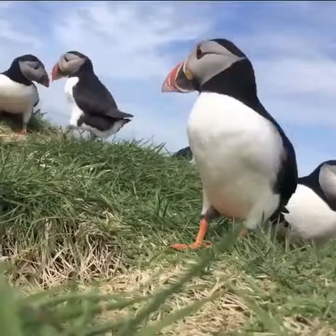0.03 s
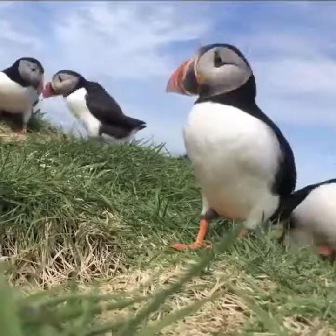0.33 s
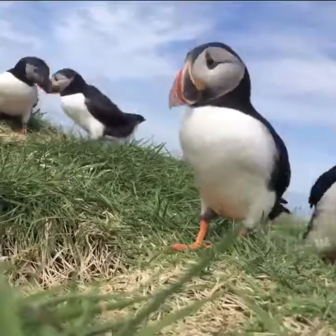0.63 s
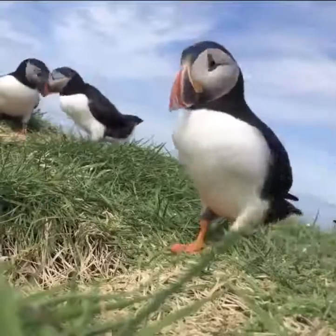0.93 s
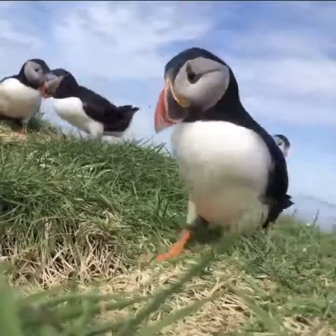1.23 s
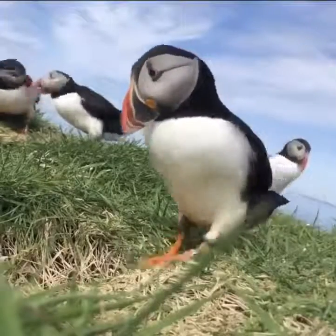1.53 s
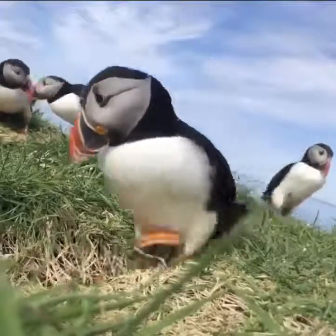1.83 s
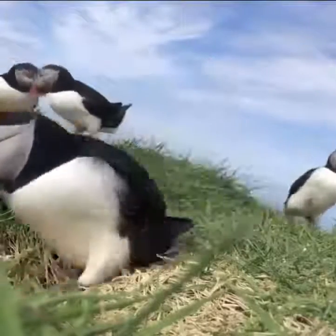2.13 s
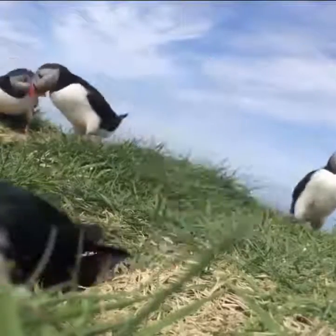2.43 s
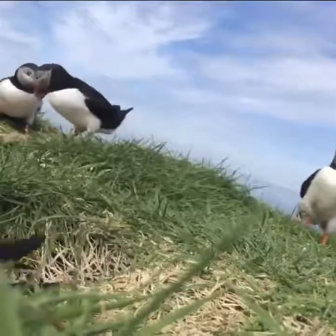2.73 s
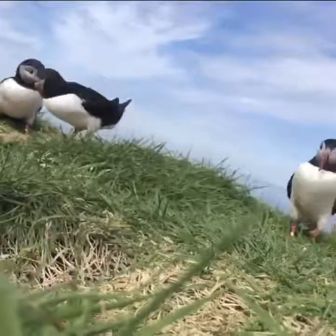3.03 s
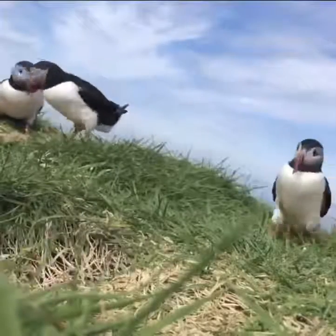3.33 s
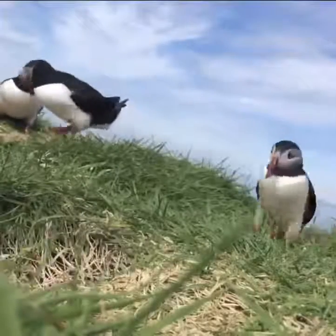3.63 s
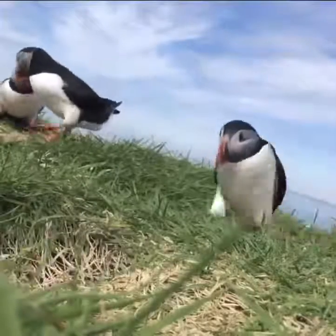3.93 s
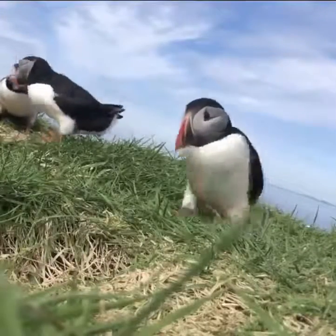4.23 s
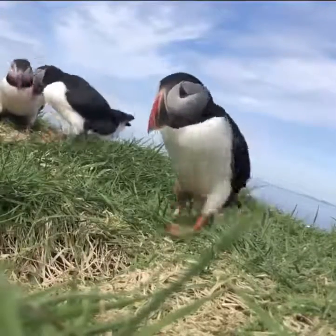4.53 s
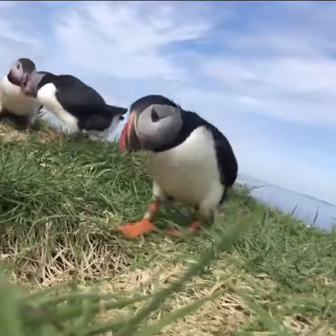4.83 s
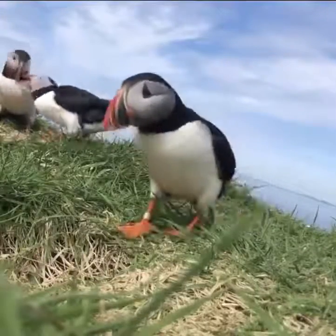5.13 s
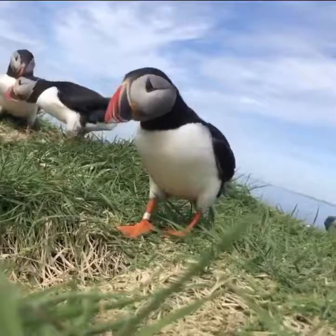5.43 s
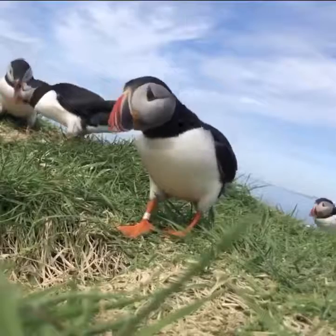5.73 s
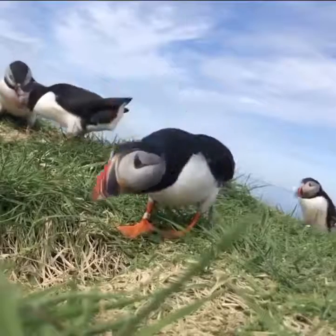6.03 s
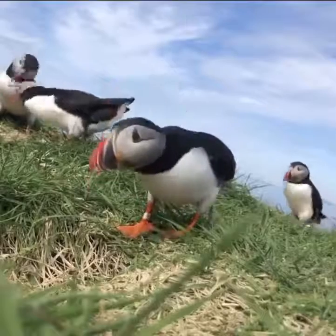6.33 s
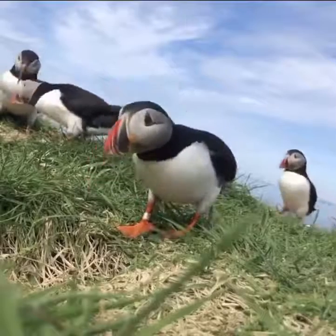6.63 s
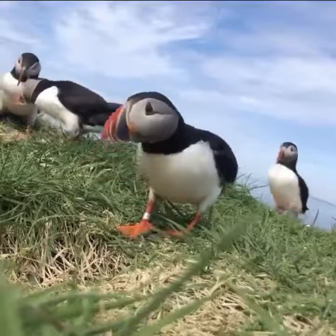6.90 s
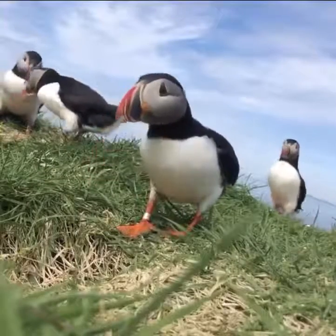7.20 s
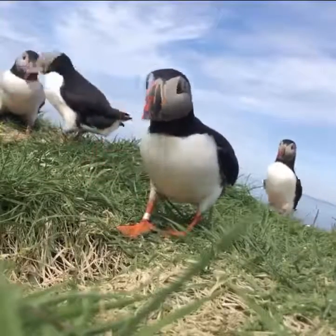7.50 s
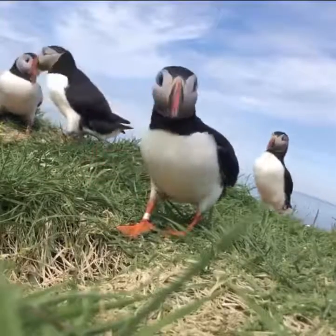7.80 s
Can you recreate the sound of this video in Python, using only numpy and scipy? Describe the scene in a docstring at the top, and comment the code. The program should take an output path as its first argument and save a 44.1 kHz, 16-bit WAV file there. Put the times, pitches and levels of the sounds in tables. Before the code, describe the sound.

Quick, dry clicking of puffin bills thins out and gives way to drawn-out groaning calls, with soft wind and faint far-off birds.

```python
"""Puffins on a grassy slope above the sea. Light wind and surf come in over a low, distant drone, and dry
grass stirs. A courting pair knock their horny bills together, up to about twelve times a second, while
feet brush the grass. Small birds start to whistle far off. As the knocking thins out, a puffin groans:
puffs of air ring through its throat, rise out of a creak, hold, and break up into a flutter.
After two groans a foot thuds softly on the turf, and the voice starts up again."""
import sys
import numpy as np
from scipy import signal
from scipy.fft import rfft, irfft
from scipy.io import wavfile
from scipy.ndimage import uniform_filter1d

SR = 44100
rng = np.random.default_rng(int(sys.argv[2]) if len(sys.argv) > 2 else 0)


def int16_out(signal):
    """Quantize to a 16-bit WAV file."""
    q = np.round(np.clip(np.atleast_2d(signal).T, -1, 1) * 32767)
    wavfile.write(sys.argv[1], SR, q.astype(np.int16))


N = 355446
T = np.arange(N) / SR

# Tone of wind and sea, before the treble roll-off. Each row: frequency in Hz, relative level in dB.
WIND_SPECTRUM = [(15, -44.5), (25, -24.5), (63, -2), (103, -1.5), (189, 0.5), (413, -4), (2330, -24),
                 (4400, -28.5), (5900, -24), (7900, -24), (8500, -29.5), (11000, -65.5), (18700, -120)]
# Gusts on the microphone. Each row: centre in seconds, length in seconds, level in dB.
GUSTS = [(4.39, .26, -56.5), (7.3, 1.0, -61)]
# Fader for the stirring grass. Each row: time in seconds, level in dB before trim and wander.
GRASS_STIR = [(0.2, -74.5), (1.7, -71), (2.25, -66.5), (2.5, -71.5), (3.25, -70.5), (3.85, -74.5),
              (4.7, -73.5), (5.6, -78), (6.8, -78), (7.4, -73), (7.85, -77)]
# Feet brushing the grass. Each row: centre in seconds, length in seconds, level in dB.
FOOT_BRUSHES = [(1.08, .031, -68), (1.57, .03, -65), (1.93, .12, -65), (2.176, 0.043, -66),
                (3.39, .03, -65), (4.293, .007, -59.5), (4.852, 0.059, -66.5), (6.112, .042, -69),
                (6.272, 0.00594, -70), (6.411, .026, -63), (7.531, .02, -62.5), (7.617, 0.018, -66)]
# Bill strikes. Each row: time in seconds, level in dB before trim, horn ring in Hz, mouth knock gain in dB.
BILL_CLICKS = [(0.229, -47, 6700, -11), (0.3472, -49.5, 6100, -6), (0.4252, -47, 7000, -0.5),
               (0.5064, -43.5, 8100, -19), (0.5816, -48.5, 6450, -28), (0.6718, -54.5, 8300, 5),
               (0.7495, -50.5, 5330, -4), (0.8312, -47, 6800, -8.5), (0.9073, -44, 6200, -24),
               (0.9866, -47, 3420, -30), (1.0625, -53.5, 5270, -3), (1.1436, -55, 8200, -2.5),
               (1.222, -49.5, 4320, -30), (1.3091, -43.5, 5500, -14), (1.4004, -46.5, 8100, -6.5),
               (1.5416, -51.5, 6470, -7), (1.6792, -47.5, 7750, -6.5), (1.7738, -45, 8450, -5),
               (1.8193, -49.5, 5500, -6), (1.9688, -54.5, 6100, -5), (2.075, -44, 7660, -5),
               (2.2579, -46.5, 7550, -3), (2.3926, -48.5, 4830, -8), (2.4484, -43.5, 8400, -29),
               (2.6157, -48.5, 8100, -10), (2.688, -47.5, 7000, -11.5), (2.7763, -45.5, 3670, -8),
               (2.864, -47, 7340, -6), (3.0315, -50.5, 7050, 0), (3.1186, -47.5, 6900, -5),
               (3.2164, -52.5, 6060, -3), (3.478, -52.5, 6560, -26), (3.609, -43.5, 5600, -7),
               (3.711, -51.5, 5760, -17), (3.793, -56, 7260, -12), (3.8828, -50.5, 5200, -8.5),
               (3.98, -52.5, 6600, -19), (4.0744, -60.5, 4600, -9), (4.3072, -59.5, 4930, -30),
               (4.7033, -60, 6400, -21), (4.9765, -64, 7900, -9), (6.1982, -62, 5810, -5),
               (6.416, -57.5, 3980, -4), (7.61, -47, 8270, -2)]
# Far whistles. Each row: start in seconds, length in seconds, pitch in Hz, glide in octaves, level in dB.
FAR_WHISTLES = [(2.74, .13, 2650, -.19, -75.5), (2.87, .06, 2260, -.08, -78), (5.48, .07, 5400, .17, -85),
                (5.801, .23, 2880, .08, -83.5), (6.12, .06, 2320, -.09, -80), (6.69, .07, 7300, .05, -85)]
# The songbird's slow phrases. Each row: start in seconds, note count, spacing in seconds,
# note length in seconds, pitch in Hz, glide in octaves, level in dB.
SONG_PHRASES = [(6.148, 5, .111, .035, 4400, -.36, -84.5), (6.823, 4, .197, .055, 4460, .2, -86.5)]
# Throat resonances at full brightness. Each row: frequency in Hz, relative level in dB.
THROAT_SPECTRUM = [(50, -45.5), (110, -19), (220, -5.5), (350, 3), (450, 1.5), (560, -2), (700, 4),
                   (810, -2), (930, -0.5), (1100, -4), (1280, -14.5), (1500, -28.5), (1800, -46),
                   (2600, -88.5)]
# The bill opens and closes on the voice. Each row: time in seconds, gain of the upper resonances in dB.
BILL_OPENING = [(4.26, -18), (4.3, -12), (4.89, -12.5), (4.93, -17.5), (5.09, -20), (5.2, -9),
                (5.29, -17.5), (5.38, -5), (5.58, 0), (5.8, -3.2), (6.2, -4.6), (6.42, -1), (6.97, -3.8),
                (7.11, -20.5), (7.32, -6), (8.05, -3)]
# Pitch line of each groan until the voice breaks. Each row: time in seconds, pulse rate in Hz.
LOW_PITCH = [(4.255, 110), (4.32, 107.1), (4.4, 111.8), (4.51, 105.2), (4.62, 103.4), (4.71, 107.6),
             (4.75, 121.5), (4.84, 116.4), (4.91, 129), (5.025, 137), (5.1, 153.9), (5.19, 177.3)]
LONG_PITCH = [(5.25, 70), (5.36, 73.1), (5.4, 127), (5.47, 193.1), (5.52, 216.3), (5.595, 218.8),
              (5.71, 240.8), (5.74, 229), (5.77, 240), (5.8, 232.5), (5.89, 241.3), (5.93, 240),
              (6.025, 259.5), (6.14, 242.3), (6.21, 239.9), (6.27, 228.5), (6.38, 219.6)]
SHORT_PITCH = [(7.11, 42.94), (7.19, 80.1), (7.35, 172.5), (7.42, 183.4), (7.61, 185.3)]
LAST_PITCH = [(7.95, 78.1), (8.05, 101)]
# The groans. Each row: pitch line, start, break and end in seconds, final pulse rate in Hz, clear-voice
# level at top pitch in dB, swell in dB per octave, creak from 0 to 1, mouth resonance at top pitch in Hz.
GROANS = [(LOW_PITCH, 4.252, 5.21, 5.26, 75, -41.9, -3.0, .13, 690),
          (LONG_PITCH, 5.25, 6.4046, 6.985, 40, -35.7, 5.14, .55, 757),
          (SHORT_PITCH, 7.11, 7.6185, 7.89, 90, -37, 4, .1, 770),
          (LAST_PITCH, 7.885, 8.1, 8.2, 80, -46, 2.6, .55, 680)]
# A foot on the turf. Each row: time in seconds, pitch in Hz, level in dB.
FOOT_THUDS = [(7.044, 228.7, -51)]


def undb(db):
    """Decibels to gain."""
    return 10 ** (np.asarray(db) / 20)


def unit(x):
    """Scale to an rms of 1."""
    return x / np.sqrt(np.mean(x ** 2) + 1e-20)


def curve(table):
    """Rows of time and value as an automation line."""
    return np.interp(T, *np.transpose(table))


def shape(points, hz):
    """An EQ curve in dB, read at the given frequencies."""
    point_hz, db = np.transpose(points)
    return np.interp(np.log(hz + 1), np.log(point_hz), db)


def band(x, lo_hz, hi_hz, order=2):
    """Band-pass."""
    return signal.sosfilt(signal.butter(order, [lo_hz, hi_hz], "band", fs=SR, output="sos"), x)


def walk(rate_hz):
    """Smooth random wander with a spread near 1."""
    step = int(SR / rate_hz)
    return np.sqrt(2) * uniform_filter1d(np.repeat(rng.standard_normal(N // step + 1), step), step)[:N]


def swells(table):
    """A gain line of bell-shaped swells, summed in power."""
    return np.sqrt(sum(undb(db) ** 2 * np.exp(-(2 * (T - s) / length) ** 2) for s, length, db in table))


def add(out, s, x):
    """Mix x into out from time s on."""
    i = int(round(s * SR))
    n = max(0, min(len(x), N - i))
    out[i:i + n] += x[:n]


def wind(rush_db=-56.5, buffet_db=-78.5, flicker_db=1.05, rolloff_hz=2200):
    """Wind and distant sea: a dark rush whose bands flicker separately; gusts rumble on the microphone."""
    hz = np.arange(N // 2 + 1) * SR / N
    spectrum = rfft(rng.standard_normal(N)) * undb(shape(WIND_SPECTRUM, hz))
    spectrum /= np.sqrt(1 + (hz / rolloff_hz) ** 4)
    edges_hz = [0, 100, 200, 400, 800, 1600, 3200, SR]
    bands = [irfft(spectrum * ((hz >= lo) & (hz < hi)), N) for lo, hi in zip(edges_hz, edges_hz[1:])]
    rush = sum(layer * undb(flicker_db * walk(12)) for layer in bands)
    buffet = band(rng.standard_normal(N), 45, 115, order=3)
    return unit(rush) * undb(rush_db) + unit(buffet) * np.hypot(undb(buffet_db), swells(GUSTS))


def drone(hz=59.1, level_db=-66, waver_db=-.5, drift=.007):
    """A low hum from far off, wavering slightly in pitch and level."""
    phase = 2 * np.pi * np.cumsum(hz * (1 + drift * walk(5))) / SR
    return unit(np.sin(phase) * undb(waver_db * walk(7.4))) * undb(level_db)


def grass(trim_db=-2.5, grain_db=4.5, snap_db=-7, snaps_per_s=25, snap_s=.0015):
    """Dry blades tick together: a thin stir, stems snapping back, and a burst where a foot brushes by."""
    stir_gain = undb(curve(GRASS_STIR) + trim_db + walk(8.2))
    ticks = rng.standard_normal(N) * (rng.random(N) < .12)
    ticks *= undb(grain_db * np.minimum(rng.exponential(size=N), 4))
    brushes = unit(band(ticks, 3200, 11000, order=1)) * swells(FOOT_BRUSHES)
    stir = unit(band(rng.standard_normal(N), 2000, 11000, order=1))
    kicks = (rng.random(N) < snaps_per_s / SR) * rng.random(N) ** 2
    crackle = signal.lfilter([1], [1, -np.exp(-1 / (snap_s * SR))], kicks) * rng.standard_normal(N)
    snaps = unit(band(crackle, 3500, 11000, order=1)) * undb(snap_db)
    return (stir + snaps) * stir_gain + brushes


def bills(ring_s=.00009, knock_hz=1300, knock_s=.00078, scatter_s=.0023, scatter_db=-26, trim_db=-5):
    """Horn strikes horn: a tiny ring, a second edge touching, a hollow mouth knock, scatter off the turf."""
    out, t = np.zeros(N), T[:SR // 80]
    for s, db, ring_hz, knock_db in [*BILL_CLICKS, *grazes()]:
        horn = unit(np.exp(-t / ring_s) * np.sin(2 * np.pi * ring_hz * t))
        mouth = unit(np.exp(-t / knock_s) * np.sin(2 * np.pi * knock_hz * rng.uniform(.78, 1.41) * t))
        contact = undb(scatter_db) * np.exp(-t / scatter_s) * rng.standard_normal(len(t))
        contact[0] += 1  # the first edge lands
        second_edge_s = .00028 * 2 ** (.9 * rng.standard_normal())
        contact += .71 * np.sinc((t - second_edge_s) * SR)
        snap = unit(band(signal.fftconvolve(horn, contact)[:len(t)], 1370, 9300))
        click = snap + undb(knock_db) * band(mouth, 1070, 3300)
        add(out, s, click * undb(db + trim_db))
    return out


def grazes(count=6, from_s=.25, to_s=3.5, db=-61.5, ring_hz=5500, knock_db=-5):
    """The bills touch lightly at random while the pair is busy; gives rows like BILL_CLICKS."""
    return [(from_s + when * (to_s - from_s), db, ring_hz * 2 ** (height - .5), knock_db)
            for when, height in rng.random((count, 2))]


def bird_note(length, hz, glide, arch_octaves_per_s=1.2):
    """One thin, gliding whistle; longer notes arch higher in the middle."""
    position = np.linspace(-.5, .5, int(length * SR))
    arch = np.cos(np.pi * position)
    octaves = glide * position + arch_octaves_per_s * length * (arch - .5)
    phase = 2 * np.pi * np.cumsum(hz * 2 ** octaves) / SR
    return unit(np.sin(phase) * np.sqrt(np.abs(arch)))


def small_birds(trill_hz=5220, trill_db=-83.5, group_s=.19, step_s=.031, detune=.012, flicker_db=2):
    """Scattered far whistles, and a songbird trilling in threes, then singing falling and rising notes."""
    out = np.zeros(N)
    for s, length, hz, glide, db in FAR_WHISTLES:
        add(out, s, bird_note(length, hz, glide) * undb(db))
    for s in np.arange(4.52, 5.35, group_s):
        for k in range(3):
            chirp = bird_note(length=.022, hz=trill_hz * rng.normal(1, detune), glide=-.13)
            add(out, s + k * step_s, chirp * undb(trill_db))
    for s, notes, spacing, length, hz, glide, db in SONG_PHRASES:
        for k in range(notes):
            add(out, s + k * spacing, bird_note(length, hz * rng.normal(1, detune), glide) * undb(db))
    # moving air on the long path makes the notes flicker
    return out * undb(flicker_db * walk(120))


def throat_pulse(subsample, bright_db, mouth_hz, rasp, mouth_db=5, mouth_width_hz=110, size=1024):
    """One puff of air and its short turbulent wake, ringing through throat and mouth."""
    hz = np.arange(size // 2 + 1) * SR / size
    upper = np.clip(np.log((hz + 1) / 450) / np.log(1.85), 0, 1)
    mouth = 1 / (1 + ((hz - mouth_hz) / mouth_width_hz) ** 2)
    gain = undb(shape(THROAT_SPECTRUM, hz) + bright_db * upper + mouth_db * mouth)
    # the highs come out ahead of the lows, and the mouth holds its own band a little longer
    lead_s = .0029 * (1 - 1 / (1 + (hz / 850) ** 4))
    delay_s = (size / 2 + subsample) / SR - lead_s + mouth / (4 * np.pi * mouth_width_hz)
    throat = gain * np.exp(-2j * np.pi * np.cumsum(delay_s) * SR / size)
    wake = unit(rng.standard_normal(size) * np.exp(-T[:size] / .004)) / np.sqrt(size)
    puff = rasp * (1 + upper) * rfft(wake) - 1  # the wake rasps most in the upper resonances
    return unit(irfft(puff * throat) * np.hanning(size)) / np.sqrt(size)


def groan(pitch, start, break_s, end, final_hz, top_db, swell_db, creakiness, open_hz,
          clear_hz=200, creaky_hz=70, creak_loss_db=5.5, shimmer_db=4, rest_hz=600, attack_s=.012,
          flutter_hz=32.95, flutter_db=3, flutter_lag_s=.018, run_down_db_per_octave=4.4):
    """The syrinx beats in puffs that clear as they quicken; after the break a flutter bunches them."""
    held_hz = curve(pitch)
    # at the break the pitch drops, then runs down as the air gives out
    since_break = np.maximum(T - break_s, 0)
    spent = np.clip(since_break / (end - break_s), 0, 1)
    drop = .19 * (1 - np.exp(-since_break / .055))
    rate_hz = final_hz + (held_hz * (1 - drop) - final_hz) * (1 - spent) ** .42
    # the flutter sets in just after the break and deepens to the end
    depth = np.interp(T - flutter_lag_s, T, spent) ** .51
    flutter = depth * np.cos(2 * np.pi * flutter_hz * since_break)
    # a low or broken voice creaks: raspier, quieter, less even
    creak = creakiness * np.clip((clear_hz - held_hz) / (clear_hz - creaky_hz), 0, 1) + .3 * depth
    rasp = .05 + .23 * creak
    level_db = top_db + swell_db * np.log2(held_hz / held_hz.max()) - creak_loss_db * creak
    level_db += run_down_db_per_octave * np.log2(rate_hz / held_hz) + flutter_db * (flutter - depth / 2)
    jitter = .11 * creak * walk(90) + .003 * walk(30)
    # the mouth resonance rises from rest only near the top of the pitch
    mouth_hz = rest_hz + (open_hz - rest_hz) * (rate_hz / held_hz.max()) ** 4
    bright_db = curve(BILL_OPENING)
    cycles = np.cumsum(rate_hz * (1 + .253 * flutter) * (1 + jitter) * (T > start)) / SR
    sounding = (T > start) & (T < end)
    puff_times = np.interp(np.arange(.5, cycles[sounding][-1]), cycles[sounding], T[sounding])
    out = np.zeros(N)
    for s, shimmer in zip(puff_times, rng.standard_normal(len(puff_times))):
        i = int(s * SR)
        pulse = throat_pulse(s * SR - i, bright_db[i], mouth_hz[i], rasp[i])
        gain = undb(level_db[i] + shimmer_db * creak[i] * shimmer) * np.sqrt(SR / rate_hz[i])
        attack = 1 - np.exp(-(s - start) / attack_s)
        add(out, (i - len(pulse) // 2) / SR, pulse * attack * gain)
    return out


def footfall(decay_s=.0048):
    """A webbed foot lands with a dull, quickly damped thud."""
    out, t = np.zeros(N), T[:SR // 40]
    for s, hz, db in FOOT_THUDS:
        add(out, s, unit(np.sin(2 * np.pi * hz * t) * np.exp(-t / decay_s)) * undb(db))
    return out


def scene():
    """A mono mix in the open air, with no echo."""
    puffins = sum(groan(*row) for row in GROANS) + bills() + footfall()
    return (puffins + grass() + small_birds() + wind() + drone())[None]


def record(dry, silence_s=.18, fade_s=.012, top_hz=8700):
    """A quick fade-in after a moment of silence, and a steep high cut."""
    opened = dry * np.clip((T - silence_s) / fade_s, 0, 1)
    high_cut = signal.firwin(201, top_hz, fs=SR)
    return signal.fftconvolve(opened, high_cut[None], mode="same")


dry = scene()
out = record(dry)
int16_out(out)
```